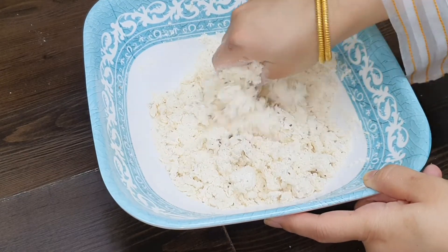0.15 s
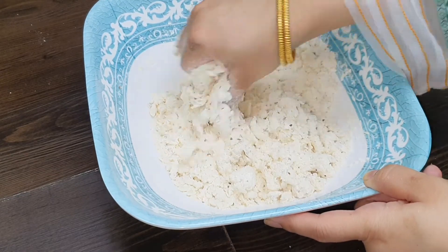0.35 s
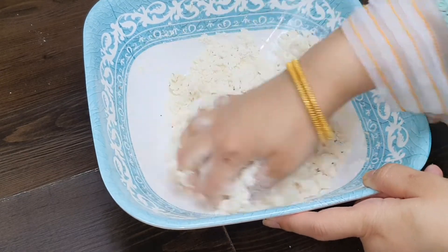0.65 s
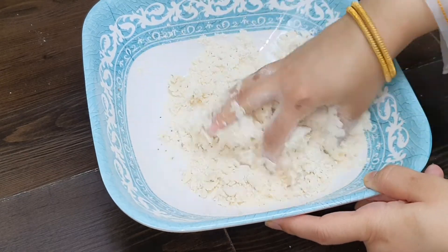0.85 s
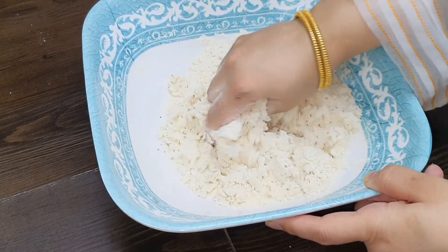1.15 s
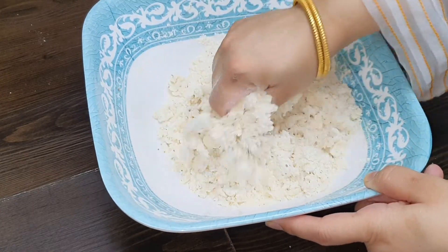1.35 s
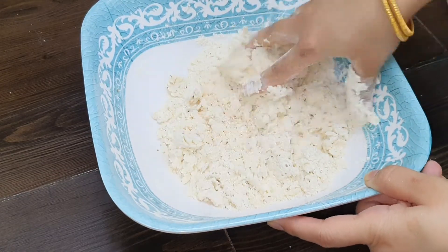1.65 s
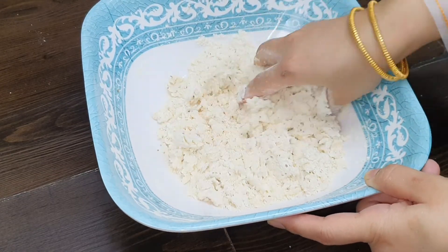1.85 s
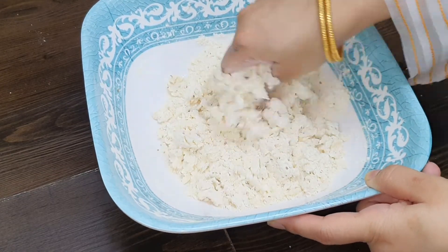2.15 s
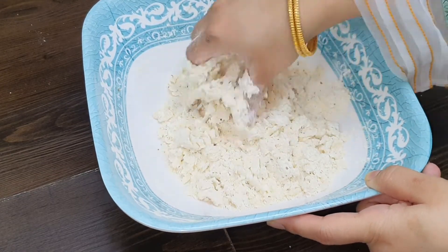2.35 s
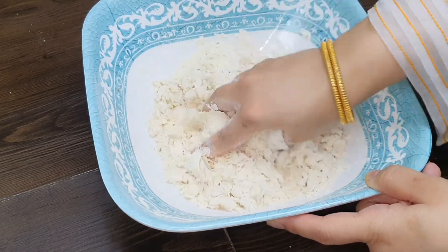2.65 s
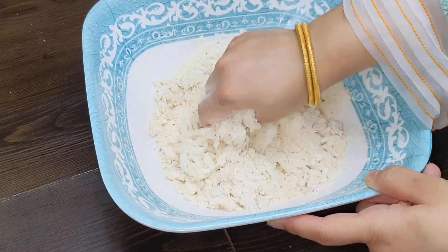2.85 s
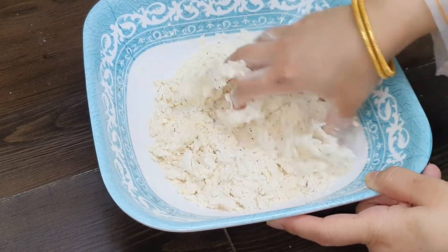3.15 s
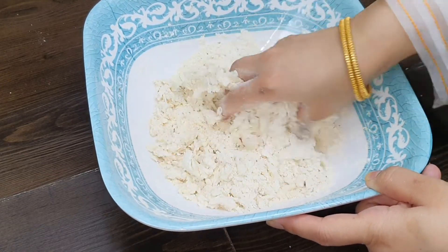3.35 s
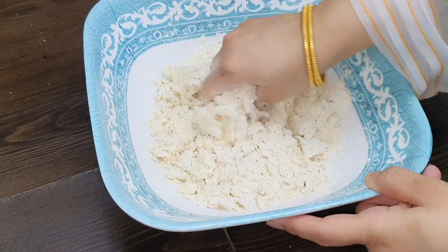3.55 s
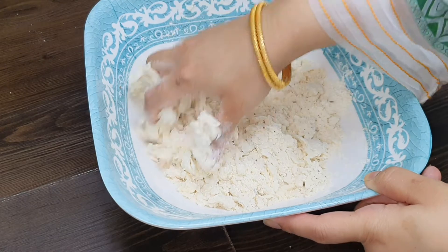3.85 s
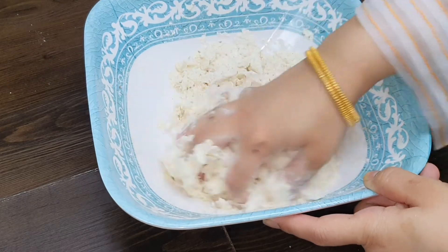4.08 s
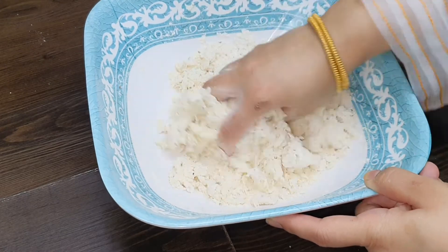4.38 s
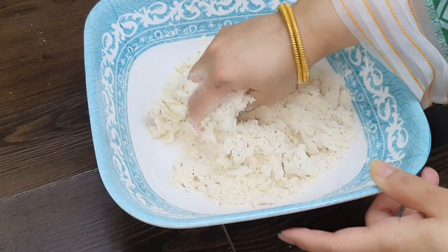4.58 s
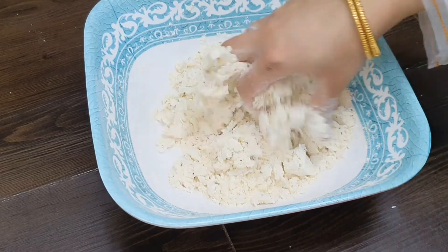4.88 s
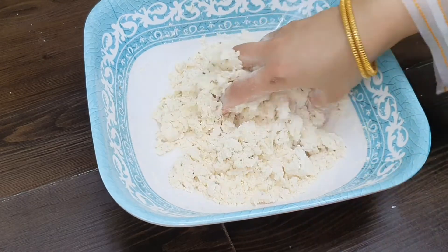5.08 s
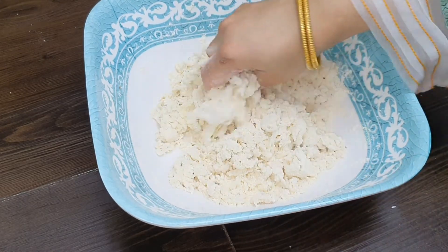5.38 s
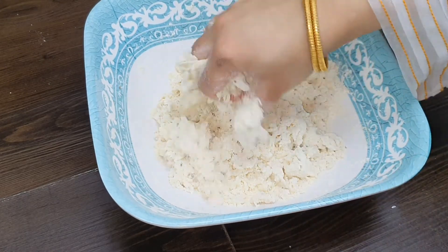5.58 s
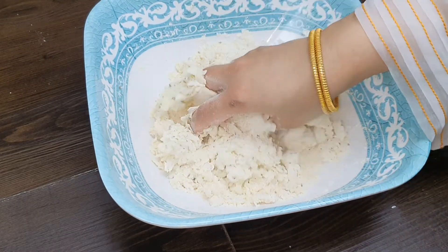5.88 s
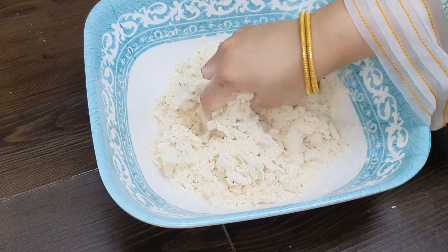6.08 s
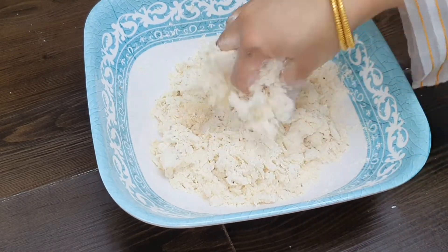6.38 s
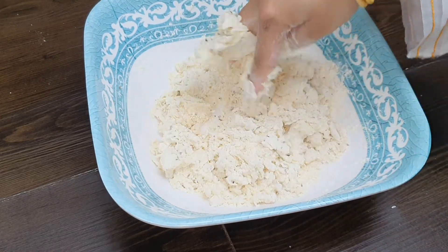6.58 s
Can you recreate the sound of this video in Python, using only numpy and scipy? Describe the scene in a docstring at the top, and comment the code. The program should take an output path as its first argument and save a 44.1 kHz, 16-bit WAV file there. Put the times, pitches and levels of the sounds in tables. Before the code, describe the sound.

Soft, grainy rubbing comes and goes as fingers work flour into crumbs in a plastic bowl, close to a stereo microphone. Two metal bangles jingle lightly, hit the rim in one loud, briefly ringing clatter, and later knock it more gently. After more strokes the bowl thuds on a wooden surface, followed by a final pressing rub and a faint tap. The room is quiet, with a low hum.

```python
"""A hand rubs flour and oil into crumbs in a hard plastic bowl, close to a stereo microphone.
Over a quiet room hum, strokes shear the grains with a soft hiss; lumps snap, two metal bangles tinkle.
At 1.8 s the bangles clatter and scrape on the rim and ring the bowl; at 3.2 s again, softer.
More strokes follow near 4 s. Around 5 s the bowl bumps hardest on the wood under it.
A last stroke presses to the bottom at 5.8 s, and a bangle taps the rim at 6.4 s."""
import sys
import numpy as np
from scipy import signal
from scipy.fft import rfft, irfft
from scipy.io import wavfile
from scipy.ndimage import uniform_filter1d

SR = 44100
rng = np.random.default_rng(int(sys.argv[2]) if len(sys.argv) > 2 else 0)


def bounce(signal):
    """Save signal as a 16-bit WAV file at the path given by the first command-line argument."""
    frames = np.transpose(np.atleast_2d(signal))
    limited = np.clip(frames, -1, 1)
    pcm = np.round(limited * 32767).astype(np.int16)
    wavfile.write(sys.argv[1], SR, pcm)


N = 296660
BIN_HZ = np.fft.rfftfreq(N, 1 / SR)
SCENE_S = np.arange(N) / SR
EVENT_N = SR // 2
EVENT_S = np.arange(EVENT_N) / SR

# finger sweeps: (peak time [s], rise [s], fall [s], level [dB])
STROKES = [(.01, .05, 0.064, -76.5), (.603, 0.064, 0.085, -53), (.71, .07, 0.15, -57),
           (1.0, .1, 0.15, -70.5), (1.739, 0.089, 0.13, -58.5), (2.6, 0.16, 0.082, -64.5),
           (2.759, 0.14, 0.11, -70.5), (3.29, 0.098, 0.13, -61), (3.985, 0.061, 0.13, -56.5),
           (4.1, 0.12, 0.1, -55.5), (4.345, 0.057, 0.05, -54), (5.02, 0.059, .18, -63),
           (5.858, 0.062, 0.029, -53.5)]
# lumps snapping: (time [s], relative level [dB])
CRUMBS = [(0.49, -49), (0.55, -42), (1.376, -52.5), (1.639, -48), (2.378, -52.5), (3.137, -63),
          (3.783, -46), (3.894, -46), (4.828, -51), (4.969, -47)]
# fingers on the bowl bottom: (time [s], length [s], relative level [dB])
PRESSES = [(0.57, 0.18, -72), (3.964, 0.14, -73), (4.303, 0.133, -52.5), (5.793, 0.12, -49.5)]
# grain, palm and bottom friction: (frequency [Hz], density [dB])
FLOUR_SPECTRUM = [(400, -26.5), (900, -16), (1700, -3.5), (2250, -8), (2550, 0), (4000, -1), (4750, 0),
                  (5300, -3), (6700, -0.5), (8500, -8), (11300, -7.5), (12800, -13), (16000, -18.5)]
PALM_SPECTRUM = [(20, -5.5), (60, 4), (230, -3), (600, -15.5), (1500, -22), (3000, -39)]
PRESS_SPECTRUM = [(20, -10), (55, 16.5), (130, -43), (600, -22), (1400, -16.5), (2400, -29), (6000, -48)]

# hard rim hits: (time [s], level [dB], brightness [Hz], fade [dB/s], bass drive [dB], note lift [dB])
KNOCKS = [(1.7701, -18, 7000, 599, -4, -2), (3.211, -30.5, 4800, -100, -5, 3.5)]
# contacts per hit: (delay [s], level [dB], brightness [ratio], note [Hz], note level [dB])
CLATTER = [(0, -0.5, 1.5, 4780, -5), (.0018, -5.5, 0.58, 2940, -1), (.0045, 1, .33, 1905, 4),
           (0.011, 1, 0.65, 2083, -1.5)]
# light rim hits: (time [s], level [dB], brightness [Hz], note [Hz])
TAPS = [(1.403, -55, 8100, 3450), (1.8227, -31, 3200, 2940), (1.8701, -33, 1200, 1880),
        (1.883, -38.5, 1500, 1910), (1.9346, -48, 1700, 2110), (1.957, -47, 2680, 2940),
        (1.973, -43.5, 2500, 2930), (1.988, -57.5, 2500, 2940), (4.58, -51, 1794, 1796),
        (6.391, -56.5, 7930, 6870), (6.393, -58, 1900, 2150)]
# bangle along the rim: (time [s], length [s], level [dB])
SLIDES = [(1.733, 0.22, -52), (1.865, 0.091, -56), (1.952, 0.052, -49), (3.194, .03, -50.5),
          (4.961, .08, -60)]
# sliding drive of the bowl modes: (frequency [Hz], gain [dB])
SLIDE_DRIVE = [(500, -29.5), (1900, -14.5), (2500, 11.5), (4000, -1), (7000, -14), (12000, -18)]
# bangle on bangle: (time [s], relative level [dB], tilt to upper modes [dB])
TINKLES = [(.28, -70, 14), (1.113, -68, -8), (1.402, -66, 6), (1.581, -63, -5), (2.04, -45.5, -2),
           (2.08, -56.5, 9), (2.919, -60.5, 4), (3.037, -69, -9), (3.619, -69, 9), (3.743, -70, 18),
           (4.445, -67, -6.5), (4.494, -63.5, -1), (4.624, -62.5, 3), (4.69, -73, 4), (4.869, -63.5, 8)]
# bowl on wood: (time [s], level [dB], brightness [Hz], rebound [dB])
BUMPS = [(.62, -39, 380, -24), (4.047, -45.5, 300, -19), (4.971, -33, 100, -16), (5.0548, -27, 456, -3.5),
         (5.346, -39.5, 320, -2.5)]
# rim and bangle contact noise: (frequency [Hz], density [dB])
CRACK_SPECTRUM = [(25, -52), (60, -36.5), (110, -21.5), (160, 1), (250, 6.5), (500, 10.5), (760, 2.5),
                  (1200, 2.5), (2000, 5), (3500, 4.5), (7000, 1.5), (8500, -7.5), (11000, -4), (16000, -14)]
TICK_SPECTRUM = [(2000, -29), (6000, 6.5), (7800, -3), (9000, -26.5), (10800, -4), (13000, 2),
                 (16000, -3)]
# resonances of bowl wall, bangle, bowl on wood: (frequency [Hz], level [dB], t60 [s])
BOWL_MODES = [(169, -10.5, 0.27), (235, 4, 0.098), (446, -4, 0.11), (1148, -10, 0.24), (1900, -2.5, .12),
              (2063, -3, 0.02), (2370, -5, 0.066), (2828, -15, 0.057), (2940, -5, 0.088),
              (3364, -4.5, 0.11), (3710, -8, 0.11), (4390, -10, 0.033), (4800, -6.5, 0.064),
              (5700, -12, 0.0097), (6000, -2.5, 0.061), (6950, -2, 0.032), (7190, -5, 0.05),
              (10820, -9.5, .03), (13000, -21, 0.045)]
BANGLE_MODES = [(5370, -15, .2), (7735, -3, .15), (7850, -5, .13), (9960, -13, .12), (10400, -13, .14),
                (10730, -8, .14), (10925, -3, .17), (11070, -7, .16), (12510, -16, .14), (15320, -21, .12)]
BASE_MODES = [(77, -13.5, 0.24), (167, 0.5, 0.061), (229.7, 11, 0.042), (297, 7, 0.037), (345, -4.5, 0.077),
              (448, -14.5, 0.17), (843, -13, 0.14), (1102, -4, 0.055)]

# room noise: (frequency [Hz], density [dB])
RUMBLE_SPECTRUM = [(12, -32), (20, -10.5), (76, 2.5), (124, -7.5), (221, -2.5), (242, -5), (301, -6),
                   (373, -2), (409, -10), (481, -4.5), (517, -12.5), (545, -12), (665, -9.5), (826, -20),
                   (1500, -24), (1950, -59), (3300, -120)]
HISS_SPECTRUM = [(700, -18), (1500, 2), (2000, 2), (3000, -6.5), (5000, -14), (9000, -30.5), (16000, -31)]
# hum tones: (frequency [Hz], level [dB])
HUM_TONES = [(72, -67.5), (218, -74), (293, -65.5), (360, -75), (483, -68)]
# reverberation: (frequency [Hz], t60 [s])
ROOM_DECAY = [(100, 0.19), (500, 0.096), (1200, 0.84), (2000, 0.25), (3000, 0.37), (7000, 0.26),
              (15000, 0.24)]
# left-right likeness of diffuse sound: (frequency [Hz], correlation [ratio])
COHERENCE = [(50, 0.88), (150, 1), (300, 0.96), (600, 0.051), (1100, 0), (16000, 0)]


def flour(slips_per_s=9000, spread_db=1.5, grit_db=0.93, grit_hz=30, slip_db=1, wall_db=-9, palm_db=-7):
    """Grains slip unevenly under each stroke and excite the bowl wall; the palm adds a low rub."""
    stroke = finger_speed() * amp(grit_db * drift(grit_hz))
    sizes = amp(spread_db * np.minimum(rng.exponential(1, (2, N)), 5))
    sizes *= rng.random((2, N)) < slips_per_s / SR
    slips = unit(colour(sizes * rng.standard_normal((2, N)), FLOUR_SPECTRUM))
    palm = unit(colour(diffuse_noise(N), PALM_SPECTRUM))
    wall = unit(convolve(slips, ring(BOWL_MODES, np.ones(len(BOWL_MODES)))))
    return stroke * (amp(slip_db) * slips + amp(wall_db) * wall + amp(palm_db) * palm)


def finger_speed(drop_db=11, roundness=1.5, squeeze_db=-21.5, squeeze_s=0.57, rest_db=-85):
    """Rounded sweeps, slower squeezing around each and a faint steady stir, summed in power."""
    power = amp(rest_db) ** 2
    for peak_s, rise_s, fall_s, db in STROKES:
        sweep = np.maximum((peak_s - SCENE_S) / rise_s, (SCENE_S - peak_s) / fall_s)
        squeeze = abs(SCENE_S - peak_s) / squeeze_s
        power += amp(db - drop_db * sweep ** roundness) ** 2
        power += amp(db + squeeze_db - drop_db * squeeze ** roundness) ** 2
    return np.sqrt(power)


def crumbs(t60_s=0.051, gain_db=-4):
    """Lumps break in short dry snaps with the colour of the flour."""
    out = np.zeros((2, N))
    for time_s, db in CRUMBS:
        add(out, time_s, amp(db + gain_db) * burst(t60_s))
    return colour(out, FLOUR_SPECTRUM)


def presses(gain_db=-2):
    """Flour dragged over the bottom makes the bowl rumble and rasp."""
    out = np.zeros((2, N))
    for time_s, length_s, db in PRESSES:
        rub = unit(colour(diffuse_noise(EVENT_N), PRESS_SPECTRUM))
        add(out, time_s, amp(db + gain_db) * rub * swell(length_s))
    return out


def rim_contact(bright_hz, bass_db, note_hz, note_db, crack_db=2, snap_db=12, ring_db=-8, split=0.013):
    """Metal on the rim: a crack, the bowl modes and the note of the struck spot."""
    mode_hz = np.array(BOWL_MODES)[:, 0]
    drive = [(500, bass_db), (1600, 0)]
    modes = ring(BOWL_MODES, soften(mode_hz, bright_hz) * amp(lookup(drive, mode_hz)))
    note_t60_s = 0.072
    beating_pair = [(hz, note_db, note_t60_s) for hz in (note_hz, note_hz * (1 + split))]  # uneven rim
    note = ring(beating_pair, weights=[0.8, 0.35])
    crack = burst(t60_s=0.054) + amp(snap_db) * (EVENT_S == 0)
    crack = colour(colour(crack, CRACK_SPECTRUM), drive)
    lowpass = signal.butter(1, bright_hz, fs=SR)
    return amp(ring_db) * modes + note + amp(crack_db) * signal.lfilter(*lowpass, crack)


def knocks():
    """The bangles land on the rim in four quick contacts, the first the brightest."""
    out = np.zeros((2, N))
    for time_s, db, bright_hz, fade_db_per_s, bass_db, lift_db in KNOCKS:
        for delay_s, contact_db, bright_ratio, note_hz, note_db in CLATTER:
            hit = rim_contact(bright_hz * bright_ratio, bass_db, note_hz, note_db + lift_db)
            add(out, time_s + delay_s, amp(db + contact_db - fade_db_per_s * delay_s) * hit)
    return out


def taps(bass_db=-10.5, reference_hz=4800):
    """Single light rim contacts: the duller the tap, the more its note stands out."""
    out = np.zeros((2, N))
    for time_s, db, bright_hz, note_hz in TAPS:
        note_db = 20 * np.log10(reference_hz / bright_hz)
        add(out, time_s, amp(db) * rim_contact(bright_hz, bass_db, note_hz, note_db))
    return out


def slides(slips_per_s=450, damping_t60_s=0.045):
    """Stick-slip of a bangle excites the middle bowl modes, damped by the contact."""
    out = np.zeros((2, N))
    mode_hz = np.array(BOWL_MODES)[:, 0]
    wall = ring(BOWL_MODES, amp(lookup(SLIDE_DRIVE, mode_hz))) * decay(damping_t60_s)
    for time_s, length_s, db in SLIDES:
        scrape = unit(convolve(wall, impulses(slips_per_s, channels=1)))
        add(out, time_s, amp(db) * scrape * swell(length_s))
    return out


def tinkles(gain_db=-2, tick_db=-7, contacts_per_s=900, graze_s=0.0019, free_db=-41):
    """The ribbed bangles graze: chatter feeds close pairs of high modes, damped by the wrist."""
    out = np.zeros((2, N))
    mode_hz = np.array(BANGLE_MODES)[:, 0]
    for time_s, db, tilt_db in TINKLES:
        tilt = amp(lookup([(7800, -tilt_db / 2), (10800, tilt_db / 2)], mode_hz))
        damping_db_per_s = 10 * max(free_db - db, 0)  # softer touches stay against the skin
        modes = ring(BANGLE_MODES, tilt) * amp(-damping_db_per_s * EVENT_S)
        chatter = impulses(contacts_per_s, channels=2) * decay(t60_s=0.16)
        chatter[:, 0] = 2  # firm first touch
        chatter /= np.linalg.norm(chatter, axis=1, keepdims=True)
        jingle = convolve(modes, chatter)
        tick = amp(tick_db) * colour(burst(t60_s=0.11), TICK_SPECTRUM)
        add(out, time_s, amp(db + gain_db) * (jingle + tick) * attack(graze_s))
    return out


def bumps(thud_db=3, thud_t60_s=0.073, rebound_s=0.038, rise_s=0.0024):
    """The bowl rocks onto the wood with a dull thud and rebounds once; the dough damps it."""
    out = np.zeros((2, N))
    mode_hz = np.array(BASE_MODES)[:, 0]
    for time_s, db, bright_hz, rebound_db in BUMPS:
        lowpass = signal.butter(2, bright_hz, fs=SR)
        for delay_s, contact_db in ((0, 0), (rebound_s, rebound_db)):
            thud = amp(thud_db) * signal.lfilter(*lowpass, burst(thud_t60_s))
            modes = ring(BASE_MODES, soften(mode_hz, bright_hz) ** 2)
            add(out, time_s + delay_s, amp(db + contact_db) * attack(rise_s) * (modes + thud))
    return out


def room(x, early_db=7, early_t60_s=0.26, gap_s=0.003):
    """Strong early reflections off near surfaces, then a diffuse tail dying band by band."""
    hz, frame_s, bands = signal.stft(diffuse_noise(EVENT_N), SR, nperseg=256)
    bands = bands * amp(-60 * frame_s / lookup(ROOM_DECAY, hz)[:, None])
    tail = signal.istft(bands, SR, nperseg=256)[1][:, :EVENT_N]
    arrived = EVENT_S > gap_s
    spectrum = rfft(tail * arrived * (1 + amp(early_db) * decay(early_t60_s)), SR)
    spectrum /= np.sqrt(uniform_filter1d(abs(spectrum) ** 2, size=70, axis=1) + 1e-12)  # no favoured note
    tail = irfft(spectrum, SR)[:, :EVENT_N] * arrived
    return convolve(x, tail / np.linalg.norm(tail[0]))


def background(rumble_db=-54.1, hiss_db=-70.5, waver_hz=4.4, flutter_hz=13):
    """Low room rumble, faint hiss and a wavering hum."""
    out = amp(rumble_db) * unit(colour(diffuse_noise(N), RUMBLE_SPECTRUM))
    out += amp(hiss_db) * unit(colour(diffuse_noise(N), HISS_SPECTRUM))
    for hz, db in HUM_TONES:
        tone = np.sin(2 * np.pi * hz * SCENE_S + drift(waver_hz))
        out += amp(db) * unit(tone * (1 + 0.29 * drift(flutter_hz)))
    return out


def ring(modes, weights, spread_rad=0.87, rise_s=0.00054):
    """Decaying sines; higher modes differ more in phase between the microphones."""
    out = np.zeros((2, EVENT_N))
    for (hz, db, t60_s), weight in zip(modes, weights):
        phase_rad = spread_rad * min(hz / 3000, 1) * rng.uniform(-1, 1) * np.array([[1], [-1]])
        out += weight * amp(db) * decay(t60_s) * np.sin(2 * np.pi * hz * EVENT_S + phase_rad)
    return out * attack(rise_s)


def soften(hz, bright_hz):
    """A longer contact drives high modes less."""
    return 1 / np.sqrt(1 + (hz / bright_hz) ** 2)


def burst(t60_s):
    """Decaying puff of dense vibration."""
    return diffuse_noise(EVENT_N) * decay(t60_s)


def impulses(per_s, channels):
    """Contacts of random time and strength."""
    return rng.standard_normal((channels, EVENT_N)) * (rng.random(EVENT_N) < per_s / SR)


def diffuse_noise(size):
    """White noise at spaced microphones: shared bass, independent treble."""
    coherence = lookup(COHERENCE, np.fft.rfftfreq(size, 1 / SR))
    mid, side = rfft(rng.standard_normal((2, size))) * np.sqrt([(1 + coherence) / 2, (1 - coherence) / 2])
    return irfft(np.array([mid + side, mid - side]), size)


def drift(width_hz):
    """Slow random wander, rms 1."""
    return unit(irfft(rfft(rng.standard_normal(N)) * np.exp(-(BIN_HZ / width_hz) ** 2), N))


def colour(x, spectrum):
    """Minimum-phase filter with the given dB spectrum."""
    log_gain = np.log(amp(lookup(spectrum, abs(np.fft.fftfreq(2048, 1 / SR)))))
    response = np.fft.ifft(np.exp(np.conj(signal.hilbert(log_gain)))).real
    return convolve(x, response[None])


def convolve(x, response):
    """Convolution cut to the length of x."""
    return signal.fftconvolve(x, response, axes=1)[:, :x.shape[1]]


def attack(rise_s):
    """Exponential rise."""
    return 1 - np.exp(-EVENT_S / rise_s)


def decay(t60_s):
    """Exponential fall."""
    return amp(-60 * EVENT_S / t60_s)


def swell(length_s):
    """Rounded rise and fall."""
    return np.sqrt(np.maximum(1 - (2 * EVENT_S / length_s - 1) ** 2, 0))


def lookup(table, hz):
    """Interpolate over log frequency."""
    table_hz, values = np.transpose(table)
    return np.interp(np.log(hz + 1), np.log(table_hz + 1), values)


def add(mix, time_s, sound):
    """Mix in a sound at time_s."""
    part = mix[:, round(time_s * SR):][:, :sound.shape[-1]]
    part += sound[..., :part.shape[-1]]


def amp(db):
    """dB to gain."""
    return 10 ** (np.asarray(db) / 20)


def unit(x):
    """Scale to rms 1."""
    return x / np.sqrt(np.mean(x ** 2) + 1e-20)


def scene():
    """Hand, bowl and bangles in the room."""
    # (sound, room send [dB])
    sources = [(knocks(), -5), (taps(), -8), (slides(), -3), (bumps(), -10), (tinkles(), -5),
               (flour() + crumbs() + presses(), -4)]
    direct = sum(sound for sound, _ in sources)
    send = sum(amp(send_db) * sound for sound, send_db in sources)
    return direct + room(send) + background()


def record(dry, right_db=0.87, right_lag_s=0.00025, cutoff_hz=15900):
    """Right microphone slightly louder and later; both band-limited."""
    right = irfft(rfft(dry[1]) * np.exp(-2j * np.pi * BIN_HZ * right_lag_s), N)
    pair = np.array([dry[0], right]) * amp([[-right_db / 2], [right_db / 2]])
    lowpass = signal.firwin(511, cutoff_hz, window=("kaiser", 9), fs=SR)
    return signal.oaconvolve(pair, lowpass[None], "same")


dry = scene()
out = record(dry)
bounce(out)
```